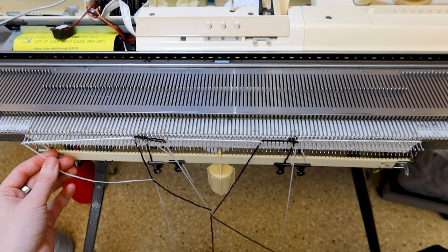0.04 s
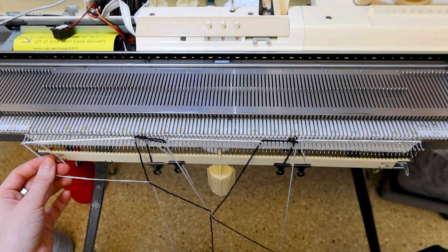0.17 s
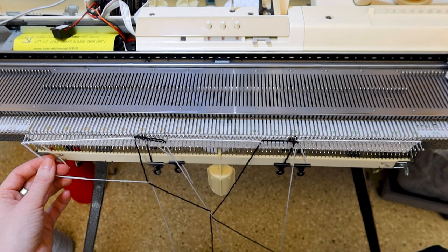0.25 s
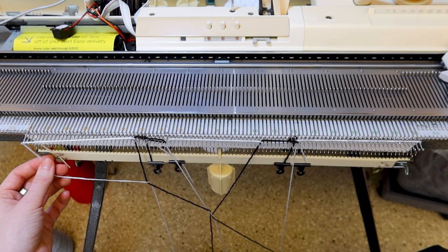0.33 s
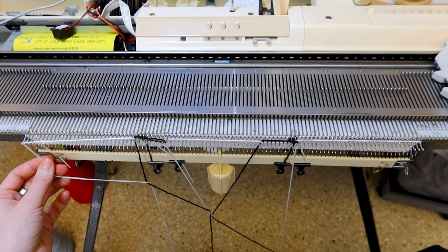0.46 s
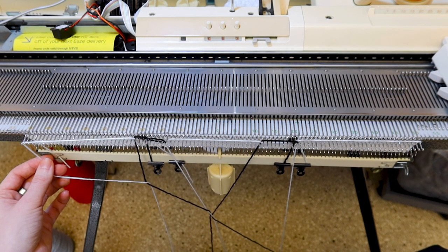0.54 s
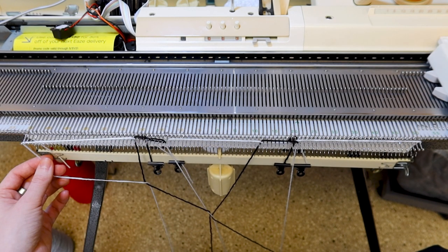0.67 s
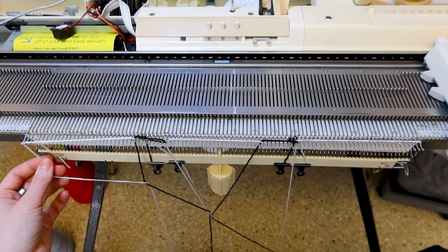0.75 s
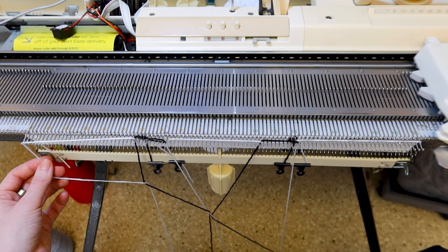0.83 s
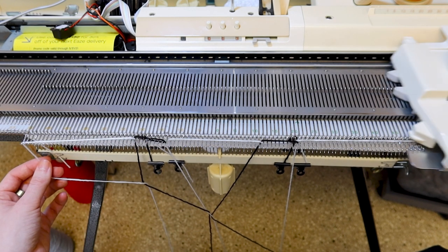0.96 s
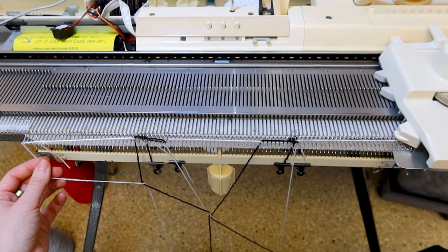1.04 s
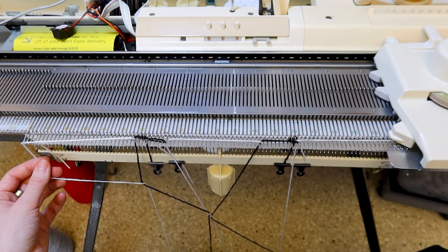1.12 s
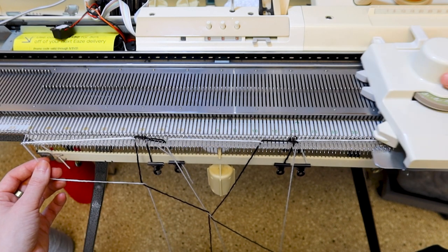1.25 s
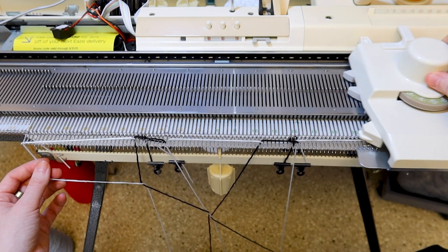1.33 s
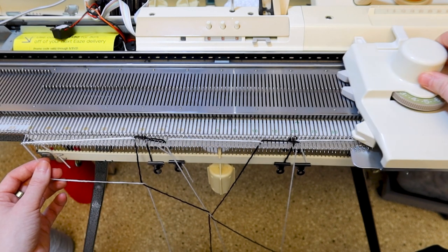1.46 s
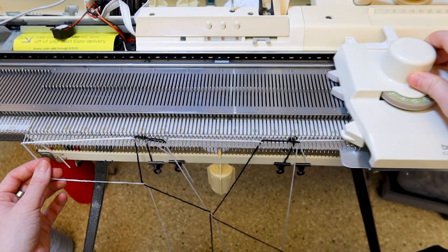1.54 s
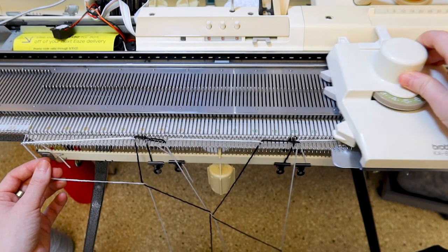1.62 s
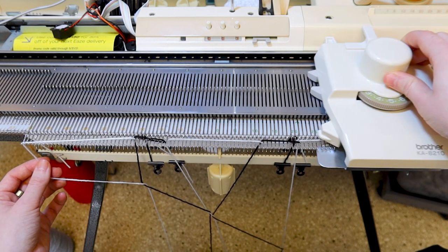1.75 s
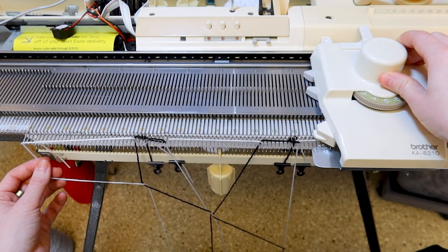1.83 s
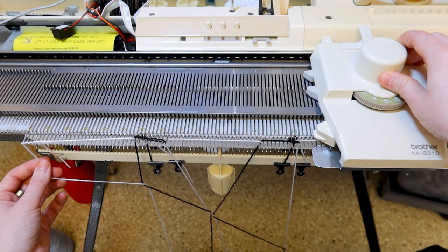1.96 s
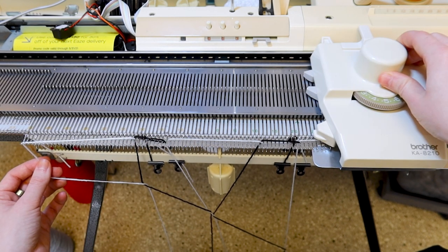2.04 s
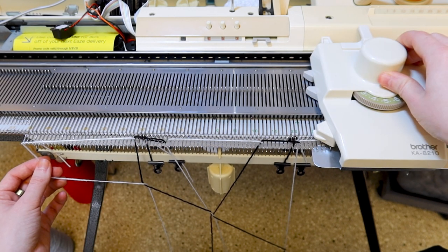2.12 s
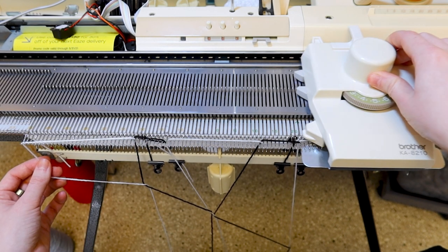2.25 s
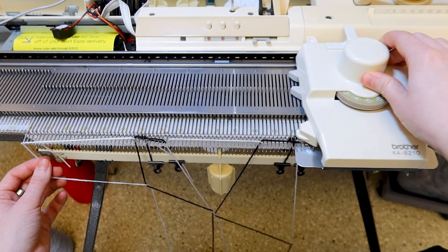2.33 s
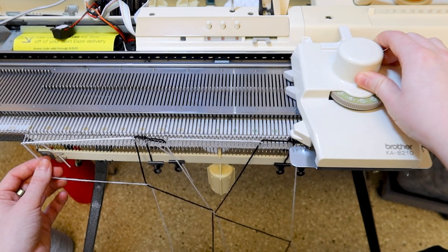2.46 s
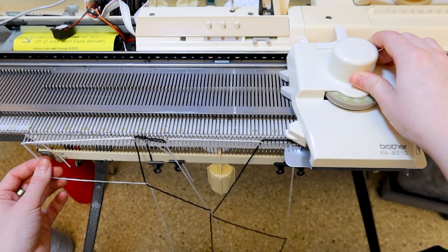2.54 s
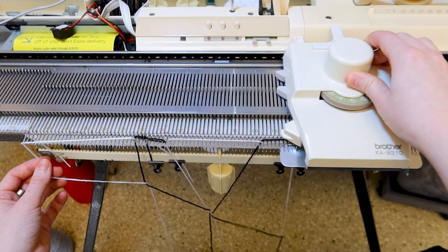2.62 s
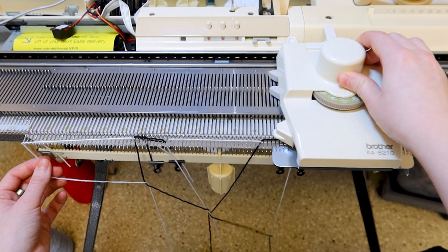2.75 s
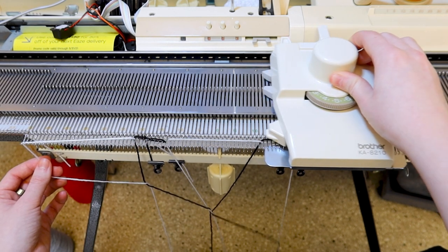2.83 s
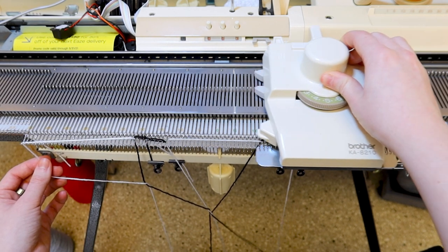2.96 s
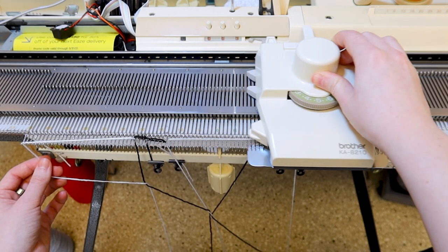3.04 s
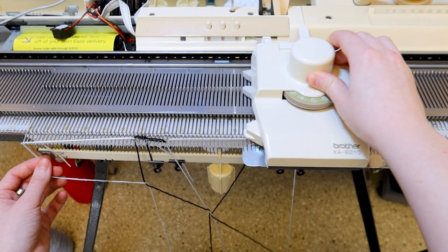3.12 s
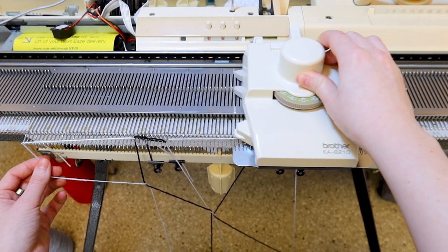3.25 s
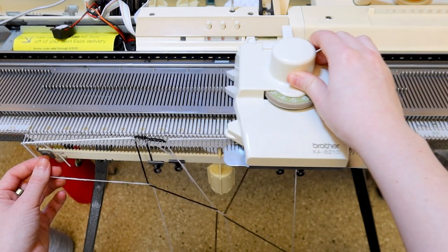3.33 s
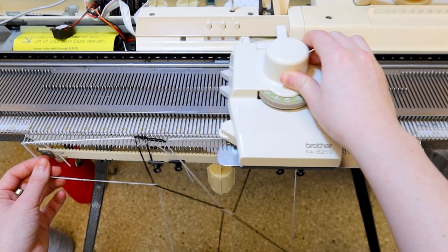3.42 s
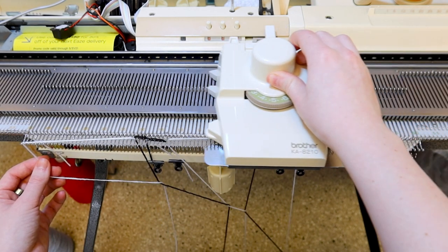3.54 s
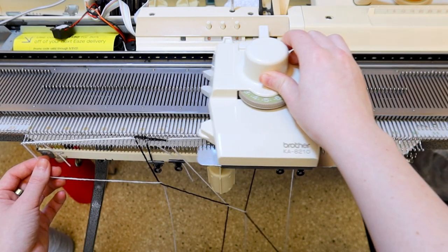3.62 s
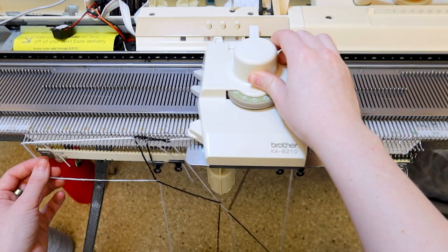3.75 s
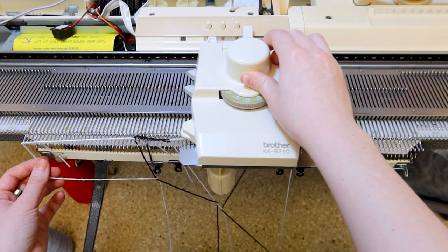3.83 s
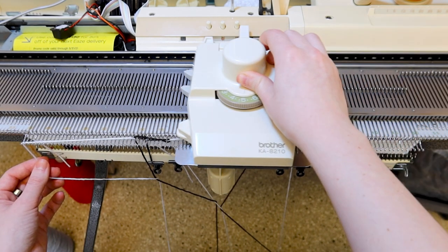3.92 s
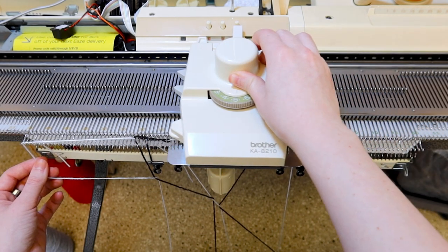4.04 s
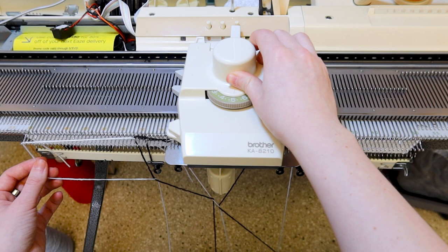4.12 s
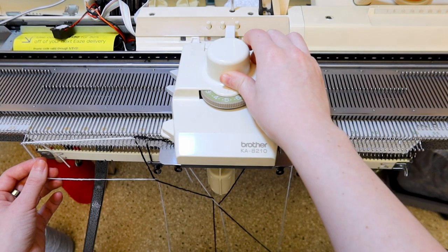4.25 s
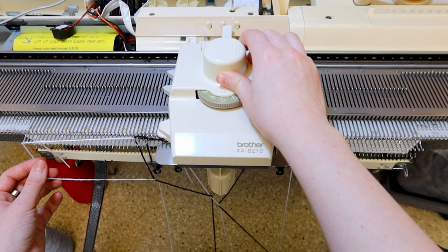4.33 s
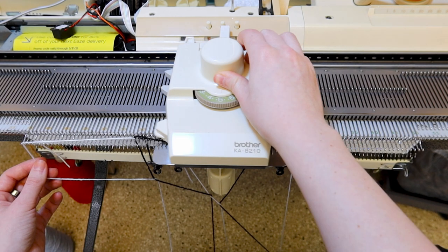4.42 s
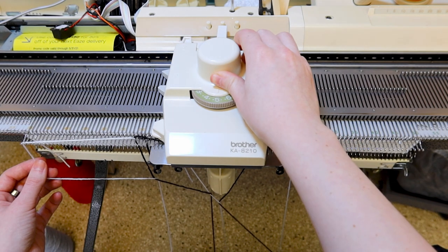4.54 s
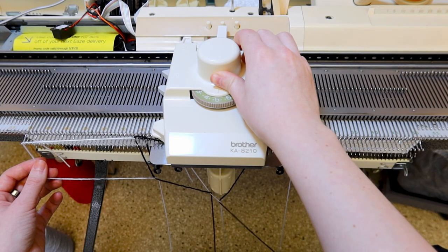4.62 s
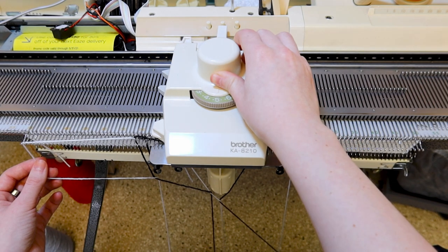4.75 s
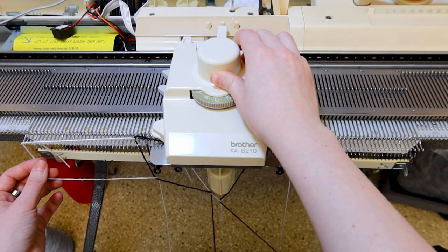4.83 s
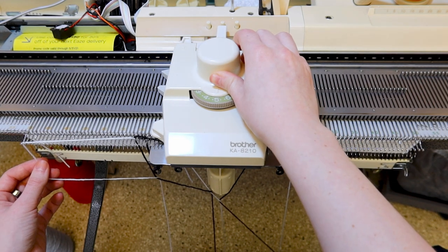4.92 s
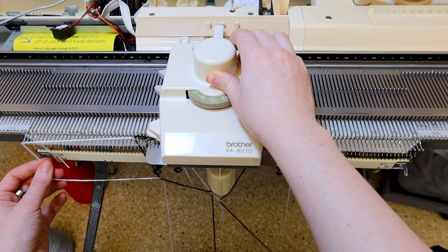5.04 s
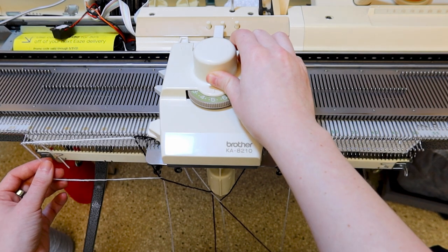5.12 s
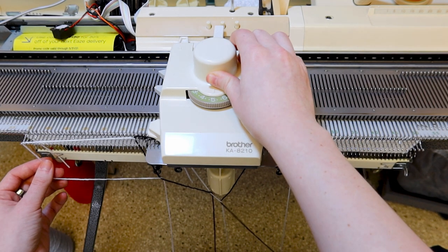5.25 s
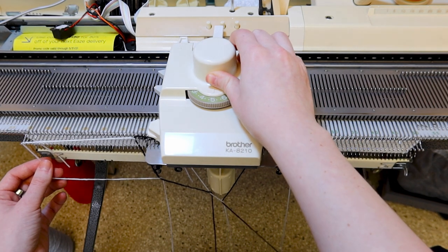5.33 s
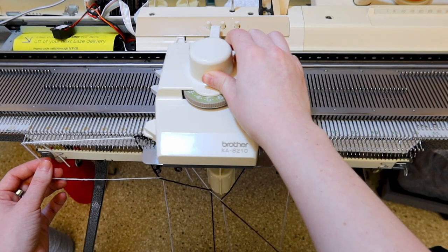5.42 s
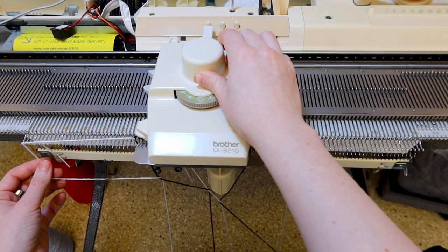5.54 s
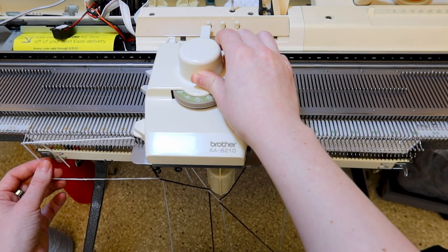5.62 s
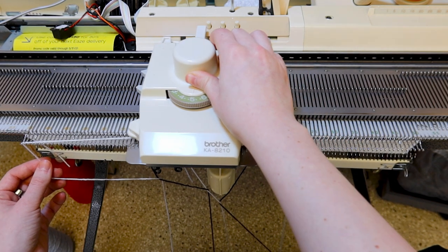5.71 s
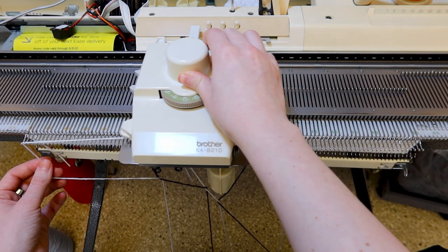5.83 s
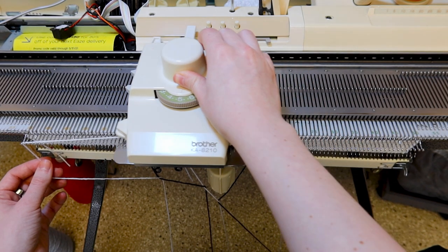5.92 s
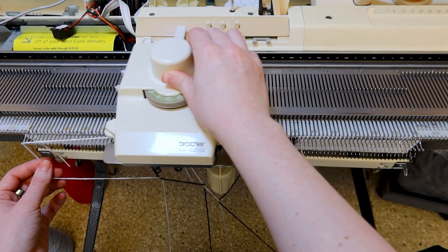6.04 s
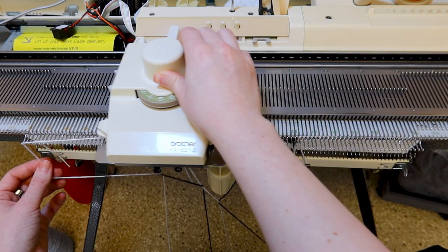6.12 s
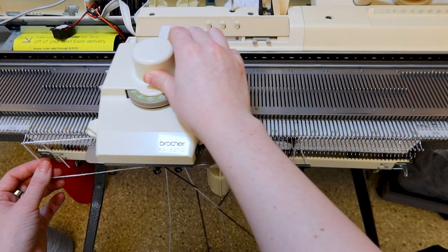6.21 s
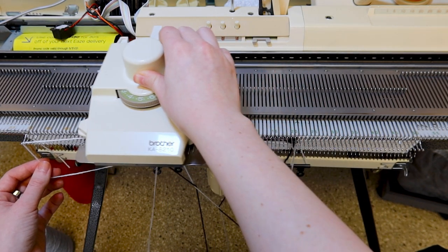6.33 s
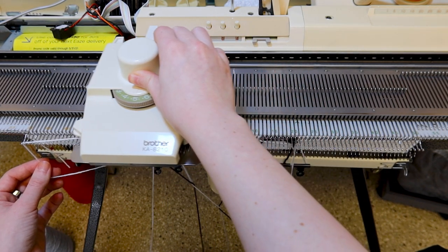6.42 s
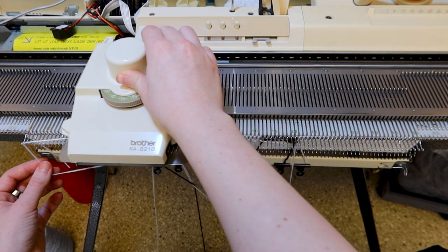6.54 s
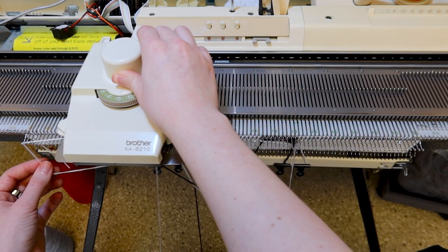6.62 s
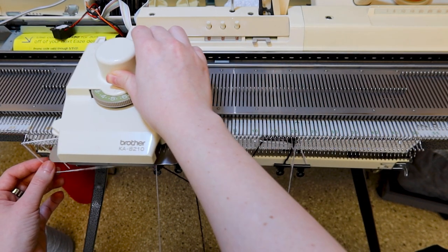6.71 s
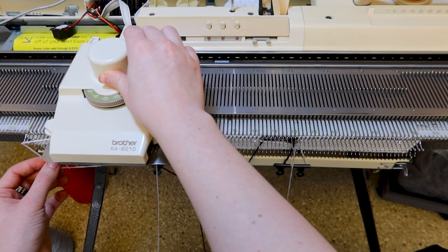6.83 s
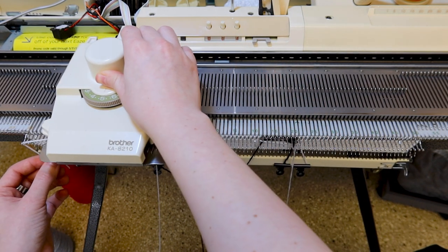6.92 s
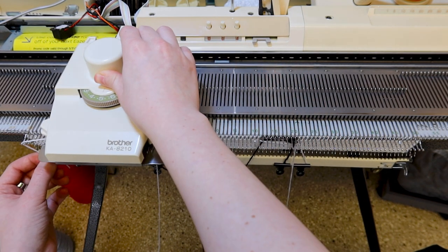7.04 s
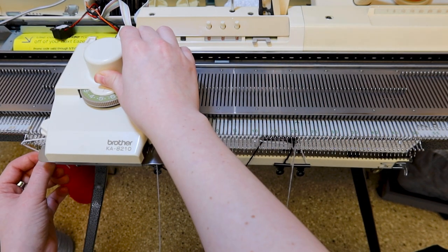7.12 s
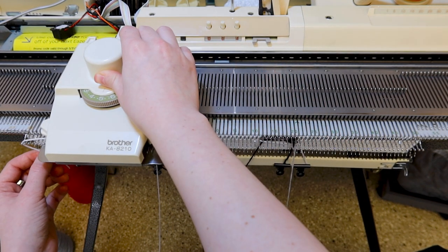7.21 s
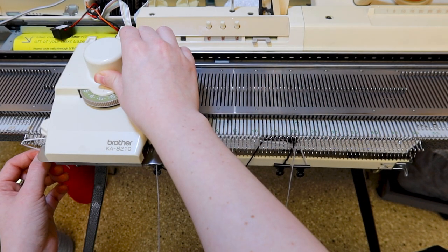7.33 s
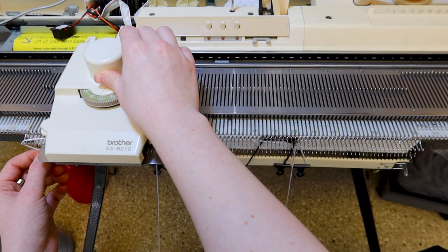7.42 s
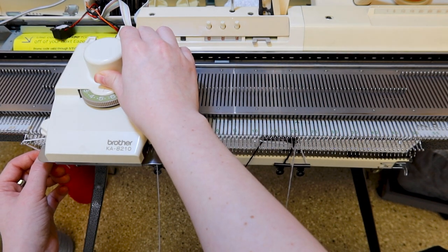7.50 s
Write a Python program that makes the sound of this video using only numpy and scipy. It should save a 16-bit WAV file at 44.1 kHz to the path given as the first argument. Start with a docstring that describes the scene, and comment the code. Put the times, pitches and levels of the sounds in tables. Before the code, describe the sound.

A plastic handle creaks faintly, then a carriage rasps jerkily across steel needles with rapid metallic clicking, one hard knock midway, and short pauses.

```python
"""A small quiet room, with a stereo microphone close to a knitting machine's steel needle bed.
The room hums and hisses. A hand takes hold of the carriage, and its plastic creaks as resonances fed by slips.
The carriage then goes along the bed in jerks: shaped noise makes the rub, and puffs of noise into steel
resonances make needle after needle flick. Once it knocks over a stop, a crack and a low boom.
The walls answer with a short decaying tail."""
import sys
import numpy as np
from scipy import signal
from scipy.fft import rfft, irfft, next_fast_len
from scipy.io import wavfile
from scipy.ndimage import uniform_filter1d, map_coordinates

SR = 44100
rng = np.random.default_rng(int(sys.argv[2]) if len(sys.argv) > 2 else 0)


def int16_out(signal):
    """Quantize to a 16-bit WAV file."""
    q = np.round(np.clip(np.atleast_2d(signal).T, -1, 1) * 32767)
    wavfile.write(sys.argv[1], SR, q.astype(np.int16))


N = 333837  # samples

# Levels in the tables guide each layer before the microphone and walls.
# steep() narrows its resonances, so a nominal_width_hz is not the final width.

# The room at rest: pitch_hz, relative_density_db (per Hz)
AIR = [(12, -39.5), (20, -6.5), (37, -18.5), (70, -3), (95, -8.5), (137, -3), (227, -5), (292, -15),
       (317, -12.5), (397, -11.5), (620, -17.5), (674, -18), (969, -19.5), (4250, -29.5), (15800, -46.5)]
# Likeness of the room in the two ports: pitch_hz, left_right_likeness (-1 to 1)
AIR_ALIKE = [(60, 1), (180, 0.77), (550, 0.1084), (1650, 0.056), (4970, 0.43), (15000, 0.18)]
# Swell of the room's low part: time_s, change_db
DRONE = [(0, -6), (.7, -3), (3, -4), (5, -1.5), (6.5, -5), (7.5, -7.5)]
# A faint low hum: time_s, pitch_hz, level_db (both waver)
HUM = [(.35, 210, -92), (.55, 215.6, -80), (.85, 228, -75), (1.03, 224, -70), (1.12, 236, -101)]
# Decay of the walls' tail: pitch_hz, t60_s
ROOM = [(200, 0.47), (2000, 0.35), (10000, 0.12)]
# Likeness of the close sound in the two ports: pitch_hz, left_right_likeness (-1 to 1)
NEAR_ALIKE = [(300, 1), (700, 0.98), (1400, 0.99), (3100, 0.92), (5500, 0.59), (8000, 0.053),
              (11000, -0.26), (15000, -0.78)]
# Balance as the carriage crosses before the ports: time_s, left_over_right_db
LEAN = [(0, 2.5), (2, 1.13), (3.5, 0.5), (4.5, -1.3), (7.5, 0)]
AIR_DB, TOP_HZ = -66, 15830  # room level; top of the microphone's band

# The handle creaks: time_s, level_db, thin_ring_level_db
GRIP = [(0.12, -92, -99), (0.148, -95, -99), (0.192, -68, -79.5), (0.33, -62, -64), (0.41, -73, -87),
        (0.44, -67.5, -90), (0.486, -55.5, -70), (0.535, -65, -72), (0.618, -85, -99), (0.64, -79, -99)]
# Single slips in the plastic: start_s, peak_db, upper_mode_lift_db, favoured_pitch_hz
TICKS = [(0.194, -54, 26, 3220), (0.222, -59, 8, 4080), (0.312, -52, -17, 2180), (0.445, -54, 5, 2930),
         (0.464, -46, 3, 4520), (0.479, -44, 3, 3220), (0.495, -46.5, -2, 3220), (0.7578, -55, 11, 2930),
         (0.8317, -57, 5, 2930), (0.852, -52, 4, 2930), (5.3272, -51.5, 21, 2930), (5.405, -55.5, 16, 3550)]
# Resonances of the plastic handle: pitch_hz, nominal_width_hz, level_db
HANDLE = [(580, 210, 2.5), (1415, 54, 15), (2180, 890, -2.5), (2930, 210, -12.5), (3220, 140, -6.5),
          (3550, 38, -6), (4080, 55, -11), (4520, 40, -4), (5300, 310, -8.5)]
# The thin low ring in the creak: pitch_hz, nominal_width_hz, level_db
THIN_RING = [(950, 14, 0)]
UPPER_HZ, FAVOUR_DB = 1800, 9  # start of the handle's upper modes; lift of a tick's favoured mode
TICK_S = 0.00213  # contact time

# The carriage strikes a stop and rebounds: start_s, crack_peak_db, boom_peak_db
KNOCK = [(3.514, -14.5, -31), (3.517, -19.5, -17), (3.521, -20.5, -22.5), (3.536, -23, -28),
         (3.555, -24.5, -28.5)]

# The push, one list for each shove: time_s, needle_rub_db, shell_rub_db, shell_rub_centre_hz
SHOVES = [
    [(0.93, -72, -66, 1280), (0.958, -73.5, -46, 940), (1.005, -58.5, -61.5, 875), (1.032, -49.5, -58, 850),
     (1.088, -46, -53.5, 1047), (1.156, -56, -55.5, 940), (1.298, -47, -50, 980), (1.406, -39.5, -39, 970),
     (1.434, -49.5, -47, 900), (1.534, -52.5, -49, 1130), (1.64, -42.5, -42, 810), (1.752, -41, -43, 840),
     (1.856, -47, -45, 850), (2.05, -98, -79.5, 775)],
    [(2.18, -90, -87, 1110), (2.212, -58, -56.5, 958), (2.262, -41.5, -44.5, 830),
     (2.582, -53, -50.5, 1050), (2.664, -46, -49.5, 870), (2.832, -50.5, -50, 1050),
     (2.874, -47.5, -46, 879), (3.096, -41.5, -44, 920), (3.274, -46, -46, 980), (3.374, -40, -41, 840),
     (3.46, -38.5, -42, 1020)],
    [(3.61, -39, -42, 1000), (3.66, -40.5, -41, 1000), (3.69, -38, -42.5, 950), (3.942, -48.5, -47.5, 800),
     (4.152, -50.5, -51, 1160), (4.182, -65.5, -50.5, 1120), (4.226, -54.5, -54.5, 1150),
     (4.472, -60.5, -54.5, 1170), (4.526, -59.5, -56.5, 850), (4.572, -56, -54.5, 1130),
     (4.672, -99, -92, 842), (4.7, -79, -78, 950)],
    [(5.0, -90.5, -74, 833), (5.048, -52, -70.5, 1140), (5.06, -72, -53.5, 1080), (5.094, -61.5, -56, 1114),
     (5.2, -91, -81.5, 1020)],
    [(5.428, -83, -90, 979), (5.44, -55, -59.5, 960), (5.53, -42, -44.5, 1020), (5.684, -54.5, -54.5, 1060),
     (5.964, -49.5, -50.5, 970), (6.108, -43.5, -45.5, 727), (6.166, -35.5, -40.5, 804),
     (6.392, -43.5, -45.5, 815), (6.48, -46.5, -49, 1120), (6.528, -38, -42, 940), (6.658, -47, -47.5, 860),
     (6.774, -45.5, -48, 1080), (6.864, -45, -46.5, 760), (6.994, -53, -53.5, 985), (7.15, -88, -83, 755)],
]
# Bed and carriage shell: pitch_hz, nominal_width_hz, level_db
SHELL = [(373, 264, -10.5), (485.7, 30, 2), (601, 82, -2), (685, 97, -1), (817.7, 101, 0), (916, 141, -3),
         (1068, 193, -8), (1249, 175, -0.5), (1335, 113, -3.5), (1337, 44, -9), (1620, 420, -5.5)]
# Needles in their slots: pitch_hz, nominal_width_hz, level_db
NEEDLE = [(2010, 346, -10), (2198, 160, -2.5), (2870, 110, -2), (3056, 218, 0), (3360, 555, -3),
          (4460, 90, -1.5), (4663, 100, 3), (5610, 440, -3.5), (7040, 130, -14), (7800, 1250, -7.5),
          (8110, 470, 1.5), (9200, 1100, -12.5), (10000, 260, -3), (10800, 2300, -8.5), (12420, 310, -5),
          (12920, 610, -3)]
# Metal sliding on metal: pitch_hz, relative_density_db (per Hz)
HISS = [(400, -14.5), (1500, 26.5), (5500, -9), (6700, 0), (9000, 26.5), (13000, 19.5), (15800, -41)]
# Edges of the families of modes, low to high: pitch_hz
FAMILIES_HZ = [0, 540, 760, 980, 1150, 1380, 1850, 3300, 4550, 6500, 20000]
# Level of each family against its rub level, low to high: relative_level_db
SHARE_DB = [-7.5, -3.5, -1.5, -3, -3, -7.5, -9, -7.5, -10, -11]
FALL_DB = 6  # loss per octave for shell modes away from the rub's centre
UNDER_CAM_DB, UNDER_CAM_S = 5, 0.42  # greatest lift of the flicked needles' family; averaging time

# A thin steel part that rings long: pitch_hz, width_hz, level_db (at a needle rub of -52.5 dB)
WIRE = [(4430, 11, -68)]
WIRE_FOLLOWS = .6  # dB per dB of needle rub

# Rings of the bed that shift and swell as the carriage moves along it:
# width_hz, then a list of time_s, pitch_hz, level_under_needle_rub_db
RINGS = [(45, [(1.0, 980, -14), (1.08, 1045, -3), (1.3, 1040, -2), (1.5, 1040, -8), (2.0, 1020, -18),
         (4.6, 1050, -18), (5.1, 1130, -8), (5.6, 1060, -12), (7, 1060, -20)]), (150, [(1.0, 2600, -11),
         (1.3, 2560, -18), (2.3, 2600, -14), (3.5, 2560, -14), (4.6, 2500, -12), (5.06, 2600, -20),
         (5.075, 2560, -11), (5.6, 2480, -13), (6.1, 2360, -13), (7, 2400, -16)]), (80, [(1.0, 4170, -8),
         (1.3, 4120, -7), (1.8, 4120, -13), (2.26, 4100, -11), (2.5, 4080, -17), (3.5, 4080, -17),
         (4.6, 4060, -14), (5.5, 4060, -11), (5.9, 4060, -8), (7, 4050, -10)]), (130, [(1.0, 4790, -14),
         (1.8, 4900, -16), (2.4, 5100, -14), (3.0, 5120, -8), (3.6, 5080, -10), (4.5, 4950, -11),
         (5.1, 4700, -14), (7, 4750, -18)]), (110, [(1.0, 5300, -11), (1.8, 5330, -11), (2.4, 5300, -13),
         (3.0, 5320, -7), (4.5, 5330, -11), (5.1, 5330, -14), (5.6, 5380, -8), (6.1, 5380, -7),
         (6.4, 5370, -13), (7, 5330, -17)]), (130, [(1.45, 6200, -15), (1.55, 5750, -15), (2.0, 5750, -16),
         (2.2, 6250, -16), (3.0, 6270, -14), (4.6, 6200, -18), (5.3, 5900, -17)]), (150, [(1.0, 7400, -10),
         (1.2, 7400, -16), (1.5, 7400, -26)]), (170, [(1.0, 8950, -24), (1.3, 8950, -19), (1.8, 8950, -18),
         (2.3, 8950, -23), (7, 8950, -24)]), (200, [(1.0, 1950, -15), (3.5, 1800, -13), (4.6, 1850, -15),
         (5.0, 1850, -26)])]
# Loose needles jostle: jolts a second, spread in dB, steady part, jolted part
RATTLE_PER_S, RATTLE_SPREAD_DB, RATTLE_SMOOTH, RATTLE_SHARE = 91, 5, 0.37, 0.54
JOG_DB, JOG_S = -11.5, 0.01  # each flick jogs the rings, dying in about this time

# Needles flicked by the cams: time_s, guide_peak_db, strongest_ring_hz, latch_snap_relative_db
FLICKS = [(0.952, -47, 3610, -33), (0.9891, -42.5, 3350, -39), (1.015, -37, 4200, 0.5),
          (1.057, -34.5, 4244, -6), (1.0807, -36.5, 4260, -12.5), (1.113, -37, 4095, -13.5),
          (1.1445, -47, 4080, -13.5), (1.166, -36, 4200, -10.5), (1.212, -39.5, 5370, -9.5),
          (1.252, -34.5, 4127, -9), (1.2827, -37.5, 4070, -9.5), (1.3249, -38, 4150, -8),
          (1.3523, -31, 5460, -12.5), (1.3813, -36, 5570, -3), (1.3955, -39.5, 5300, -20),
          (1.4414, -35, 4200, -13), (1.477, -37.5, 1976, -20), (1.5005, -39.5, 1974, -18.5),
          (1.5579, -37.5, 5460, -11), (1.586, -41, 4230, -12.5), (1.6222, -36, 5780, -20),
          (1.6432, -40, 5260, -3.5), (1.6682, -34, 2170, -16), (1.6897, -36, 2590, -11),
          (1.73, -34, 5200, -12), (1.7527, -36, 5700, -14), (1.7917, -37.5, 3720, -14),
          (1.859, -42, 2010, -2.5), (2.218, -47.5, 2650, -10), (2.2423, -49, 3900, 5.5),
          (2.265, -34, 4350, -17), (2.3094, -34.5, 2710, -6.5), (2.3304, -37, 3470, -6),
          (2.3542, -36.5, 2780, -9), (2.38, -37.5, 2816, -28), (2.4184, -43.5, 2850, -4.5),
          (2.4563, -41.5, 5300, -6), (2.4956, -35.5, 2770, -7.5), (2.5722, -42, 2930, -4.5),
          (2.602, -43, 2620, -16.5), (2.6282, -39, 3840, -3), (2.649, -38.5, 2930, -11),
          (2.6675, -41, 4610, -8), (2.706, -33.5, 4250, -13), (2.759, -44, 3830, -5.5),
          (2.7807, -40.5, 4480, -20), (2.833, -41.5, 3630, -13), (2.853, -37.5, 5000, -14.5),
          (2.8734, -42.5, 5270, -15), (2.9126, -37.5, 2930, -16.5), (2.9307, -36.5, 5190, -12),
          (2.9626, -31.5, 2754, -17.5), (2.9986, -33.5, 5000, -12.5), (3.054, -33.5, 4770, -17),
          (3.0777, -34, 2630, -13.5), (3.0967, -31, 5290, -13), (3.1538, -32, 5320, -14.5),
          (3.2138, -35, 5300, -12.5), (3.269, -40.5, 5300, -2.5), (3.2919, -36, 5130, -17),
          (3.3226, -29.5, 4890, -12), (3.3753, -30.5, 2450, -10), (3.4207, -34.5, 5290, -15),
          (3.4579, -38.5, 5260, -26), (3.585, -35, 2210, -10), (3.6271, -37, 5330, -9),
          (3.6705, -32.5, 2010, -12.5), (3.718, -34, 1910, -8), (3.7594, -37, 5420, -12.5),
          (3.7929, -41, 4880, -9.5), (3.8276, -41.5, 2230, -10.5), (3.8574, -32, 3980, -8),
          (3.9079, -30.5, 2726, -8.5), (3.9818, -41, 2760, -8.5), (4.0132, -39, 4760, -7),
          (4.0292, -42, 4860, 4.5), (4.0626, -40, 4760, -11.5), (4.115, -44, 2780, -7),
          (4.1435, -41.5, 4920, -9), (4.2156, -38.5, 2730, -1.5), (4.245, -45, 5300, -12.5),
          (4.2647, -42, 4470, 2), (4.3087, -41, 2500, -6), (4.327, -38, 5200, -10.5),
          (4.382, -48, 2730, 4.5), (4.415, -52.5, 4040, -3.5), (4.4393, -42.5, 2700, -8.5),
          (4.5074, -52, 5280, -3), (4.519, -41, 2810, -11), (4.5393, -46.5, 5320, -31),
          (4.5579, -48.5, 5270, -10), (5.0429, -37.5, 4360, -3.5), (5.0734, -44, 2520, -10.5),
          (5.0973, -37.5, 2600, -21), (5.436, -43, 2560, -15), (5.444, -40.5, 5100, -4.5),
          (5.4665, -42.5, 2790, -1.5), (5.484, -37, 2760, -13.5), (5.5295, -33, 5150, -8.5),
          (5.5739, -38.5, 2880, -24), (5.6087, -35.5, 2630, -19.5), (5.6683, -38.5, 4080, -5.5),
          (5.7011, -38.5, 5300, -12), (5.76, -40.5, 3160, -10), (5.7765, -41, 5430, -11),
          (5.7924, -42, 3035, 0), (5.838, -36.5, 3980, -11.5), (5.851, -47, 5300, -8.5),
          (5.91, -38, 4080, -7), (5.9323, -38.5, 5560, -10.5), (5.947, -49, 4080, -14),
          (5.9601, -40.5, 3150, -3), (5.981, -36, 5980, -15.5), (5.9925, -41.5, 5420, -9.5),
          (6.0287, -34, 3900, -10.5), (6.0712, -43, 3070, -11), (6.0914, -39.5, 5500, -11),
          (6.124, -33, 5490, -9.5), (6.1651, -35, 2400, -5.5), (6.1899, -40.5, 3960, -1.5),
          (6.2311, -36, 4050, -5), (6.2709, -33, 3310, -11), (6.3681, -35.5, 3960, -9.5),
          (6.423, -38.5, 2880, -10), (6.4823, -34.5, 4064, -9), (6.496, -35, 4150, -15.5),
          (6.5305, -33.5, 4060, -14.5), (6.574, -30, 4040, -10.5), (6.6135, -28.5, 3940, -16.5),
          (6.6437, -33, 2840, -2), (6.6687, -34, 3750, -7), (6.731, -35, 4050, -12.5),
          (6.8066, -34, 2800, -11.5), (6.821, -38, 4140, -24), (6.866, -35, 4070, -1),
          (6.9387, -35, 5180, -5), (6.9845, -45.5, 3800, -16.5)]
# A needle latch: pitch_hz, nominal_width_hz, level_db
LATCH = [(7120, 90, 0), (8950, 130, 0), (10000, 200, -7), (11500, 200, 0), (12500, 300, -5),
         (13800, 1000, -11)]
# Contact time at a -51 dB needle rub; its log growth per dB of rub; its log spread by chance
FLICK_S, LONGER_PER_DB, LENGTH_SPREAD = .0034, 0.06, 0.11
LATCH_CREST_DB, SHARPER_PER_DB = 7, .09  # snap peak over its level; a harder snap is shorter
THUD_DB, THUD_SPREAD_DB = 6, 1  # thud peak over the shell rub at that moment
REBOUND_S, REBOUND_DB = .011, -10.5  # typical delay and level of the second hit
OWN_WIDTH_HZ, OWN_DB = 108, -12.5  # the flicked needle's own mode, before it is favoured
RING_IN_FLICK_DB = 14.5  # lift of the bed's rings inside a flick
PING_DB, PING_S, PING_WAVER = -2, .0045, .45  # clean ring under guide peak; fall time; waver in radians


def amp(db):
    """Decibels to amplitude."""
    return 10 ** (np.asarray(db) / 20)


def unit(x):
    """Scale to an rms of 1."""
    return x / np.sqrt(np.mean(x ** 2) + 1e-20)


def peak(x, db):
    """Scale to a peak level in dB."""
    return x * amp(db) / np.max(np.abs(x))


def along(points, hz):
    """Read (Hz, value) points on a log axis."""
    f, v = np.transpose(points)
    return np.interp(np.log(hz + 1), np.log(f + 1), v)


def curve(rows, column, rest):
    """One value per sample; rest outside the table."""
    rows = np.array(rows)
    return np.interp(np.arange(N) / SR, rows[:, 0], rows[:, column], rest, rest)


def wobble(rate):
    """A smooth random curve, rate knots a second."""
    coarse = np.arange(0, N + 32, 32)
    knots = rng.standard_normal(int(N * rate / SR) + 4)
    return np.interp(np.arange(N), coarse, map_coordinates(knots, [coarse * rate / SR]))


def filtered(x, response):
    """x times a complex response of frequency."""
    m = next_fast_len(x.shape[-1] + min(x.shape[-1], 8192))
    return irfft(rfft(x, m) * response(np.fft.rfftfreq(m, 1 / SR)), m)[..., :x.shape[-1]]


def modes(table, more_db=0):
    """The causal response of a set of resonances, alternating in sign."""
    c, w, db = np.transpose(table)[..., None]
    w = np.abs(w)
    gain = (-1) ** np.arange(len(table))[:, None] * amp(db + np.reshape(more_db, (-1, 1)))
    return lambda f: np.sum(gain * 1j * f * w / (c * c - f * f + 1j * f * w), axis=0)


def steep(table, more_db=0):
    """Resonances with dark valleys: each mode applied twice, so its skirts fall fast."""
    c, w, db = np.transpose(table)[..., None]
    gain, w = amp(db + np.reshape(more_db, (-1, 1))), 1.84 * np.abs(w)
    return lambda f: np.sum(gain * (1j * f * w / (c * c - f * f + 1j * f * w)) ** 2, axis=0)


def burst(length, sharp=0.27):
    """A contact that chatters: noise that swells and dies, its envelope peaking at 1."""
    u = np.arange(3000) / SR / np.clip(length, .0002, .02)
    return (u * np.exp(1 - u)) ** sharp * rng.standard_normal(len(u))


def snap(length, delay):
    """A short even puff of noise centred on delay, as quick to rise as to fall."""
    t = np.arange(3000) / SR
    return np.exp(-((t - delay) / length) ** 2) * rng.standard_normal(len(t))


def grit(rate, spread_db, smooth):
    """Tiny slips of uneven size at random moments, each a short chatter, over a share of smooth rubbing."""
    slips = (rng.random(N) < rate / SR) * amp(spread_db * rng.standard_normal(N))
    chatter = signal.fftconvolve(slips, np.hanning(90), "same")
    return (unit(chatter) + smooth) * rng.standard_normal(N)


def pair(mid, side, alike):
    """Left and right from two versions of a sound, alike as the table says."""
    turn = lambda hz: np.arccos(np.clip(along(alike, hz), -1, 1)) / 2
    turned = lambda hz: np.array([np.cos(turn(hz)), np.sin(turn(hz))])
    a, b = filtered(np.array([mid, side]), turned)
    return np.array([a + b, a - b])


def air():
    """The hum and hiss of the room: shaped noise whose low part swells and fades."""
    a, b = filtered(rng.standard_normal((2, N)), lambda hz: amp(along(AIR, hz)))
    low_db = np.interp(np.arange(N) / SR, *np.transpose(DRONE))
    drone = filtered(np.array([a, b]), lambda hz: 1 / (1 + (hz / 280) ** 6))
    a, b = a + (amp(low_db) - 1) * drone[0], b + (amp(low_db) - 1) * drone[1]
    return amp(AIR_DB) * unit(pair(a, b, AIR_ALIKE))


def hum():
    """A faint, fuzzy low tone from somewhere in the building: a sine wavering in pitch and level."""
    turns = np.cumsum(curve(HUM, 1, 0) + 6 * wobble(31.0)) / SR
    return amp(curve(HUM, 2, -200) + 8.0 * wobble(24.4)) * np.sqrt(2) * np.sin(2 * np.pi * turns)


def tails(t60s, count):
    """Wall tails: decaying noise of energy 1; each frequency dies at its own speed."""
    hz, t, z = signal.stft(rng.standard_normal((count, SR // 2)), SR, nperseg=256)
    tail = signal.istft(z * amp(-60 * t / along(t60s, hz)[:, None]), SR, nperseg=256)[1]
    return tail / np.linalg.norm(tail, axis=1, keepdims=True)


def scatter(x):
    """The same sound by other short paths, which change as the carriage moves: its phases drift."""
    z = signal.stft(x, nperseg=256)[2]
    drift = uniform_filter1d(rng.standard_normal(z.shape), size=3, axis=0)
    drift = uniform_filter1d(drift, size=30, axis=1)
    y = signal.istft(z * np.exp(1j * np.pi * unit(drift)), nperseg=256)[1][:N]
    return unit(y) * np.std(x)


def creak():
    """Fingers load the handle: a run of small slips in the plastic, and a few single ticks."""
    ticks, hz = np.zeros(N + SR), np.array(HANDLE)[:, 0]
    for s, db, lift_db, own_hz in TICKS:
        favour_db = FAVOUR_DB * np.exp(-(np.log(hz / own_hz) / .06) ** 2)
        more_db = lift_db * (hz > UPPER_HZ) + favour_db + rng.normal(0, 2.7, len(HANDLE))
        tick = filtered(snap(TICK_S, TICK_S), steep(HANDLE, more_db))
        ticks[round(s * SR):][:len(tick)] += peak(tick, db)
    slips = grit(300, 1.8, 1.0)
    thin = amp(curve(GRIP, column=2, rest=-200)) * unit(filtered(slips, steep(THIN_RING)))
    run = unit(amp(1.62 * wobble(58.3)) * filtered(slips, steep(HANDLE)))
    return ticks[:N] + thin + amp(curve(GRIP, 1, -200)) * run


def knock():
    """A hard blow: a wide crack, then the shell booms, most in its modes near 740 Hz."""
    out, hz = np.zeros(N + SR), np.array(SHELL)[:, 0]
    crack_colour = [(800, -20.5), (1500, 6), (2000, 11.0), (3500, 2.0), (6000, 3.0), (15000, -1.0)]  # Hz, dB
    # narrower shell modes ring longer; two low ones join them
    boom_modes = np.vstack([np.array(SHELL) * [1, .45, 1], (195, 25, -26), (280, 40, -24)])
    boom_db_by_mode = np.append(-15 * np.abs(np.log2(hz / 740)), [0, 0])
    for s, crack_db, boom_db in KNOCK:
        crack = filtered(snap(0.0046, 0.0028), lambda f: amp(along(crack_colour, f)))
        push = np.arange(len(crack)) == 0
        boom = filtered(push, steep(boom_modes, boom_db_by_mode))
        out[round(s * SR):][:len(crack)] += peak(crack, crack_db) + peak(boom, boom_db)
    return out[:N]


def rub():
    """The push as three curves: needle rub dB, shell rub dB and shell centre Hz."""
    first, before, after, *rest = SHOVES
    strokes = [first, before + after, *rest]  # the carriage keeps sliding through the knock
    return [np.max([curve(rows, column, -200) for rows in strokes], axis=0) for column in range(1, 4)]


def off_centre(hz, centre_hz):
    """Level change in dB of a shell mode away from the centre of the rub."""
    return -FALL_DB * np.abs(np.log2(hz / np.clip(centre_hz, 400, 1800)))


def under_cam(low, high):
    """Share, 0-1, of the needles now under the cams that ring between low and high Hz."""
    s, _, hz, _ = np.transpose(FLICKS)
    belongs = np.interp(np.arange(N) / SR, s, (low <= hz) & (hz < high))
    return uniform_filter1d(belongs, size=int(UNDER_CAM_S * SR))


def patchy(x, depth_db):
    """Other needles take over as the carriage moves: the colour drifts in small patches."""
    z = signal.stft(x, nperseg=256)[2]
    field = uniform_filter1d(rng.standard_normal(z.shape), size=4, axis=0)
    field = uniform_filter1d(field, size=14, axis=1)
    return signal.istft(z * amp(depth_db * unit(field)), nperseg=256)[1][:N]


def wire():
    """The needle rub shakes a thin part with one long ring."""
    noise, ring = rng.standard_normal(N), modes(WIRE)
    shake = amp(WIRE_FOLLOWS * (rub()[0] + 52.5)) * noise
    steady, shaken = filtered(np.array([noise, shake]), ring)
    return amp(WIRE[0][2]) * shaken / np.std(steady)


def slide():
    """The cams drag along the bed in uneven surges; each family of modes also wanders on its own."""
    rough = grit(400, 4, 1.0)
    surge, slips, out = wobble(45), patchy(rough, 1.1), np.zeros(N)
    needle_db, shell_db, centre_hz = rub()
    for share_db, low, high in zip(SHARE_DB, FAMILIES_HZ, FAMILIES_HZ[1:]):
        members = [m for m in SHELL + NEEDLE if low <= m[0] < high]
        family = steep(members)
        excite = amp(0.4 * surge + 1.6 * wobble(7)) * slips
        if low > SHELL[-1][0]:
            rub_db = needle_db + UNDER_CAM_DB * under_cam(low, high)
        else:
            rub_db = shell_db + off_centre(np.mean([m[0] for m in members]), centre_hz)
        level = amp(share_db + rub_db)
        # level of the family under an unchanging rub
        steady = np.std(excite) * np.sqrt(np.mean(np.abs(family(np.arange(SR // 16) * 8.0)) ** 2))
        out += filtered(level * excite, family) / steady
    # plain sliding between the modes follows the top family's level
    hiss = unit(filtered(amp(4.0 * surge) * slips, lambda hz: amp(along(HISS, hz))))
    return amp(-2.5) * out + amp(2.0) * level * hiss


def jogs(needle_db):
    """The strength of every flick over the rub, swelling and dying away after it."""
    s, db, _, _ = np.transpose(FLICKS)
    at = np.round(s * SR).astype(int)
    hits = np.bincount(at, amp(np.clip(db - needle_db[at], 0, 18) + JOG_DB), N)
    t = np.arange(2000) / SR
    return signal.fftconvolve(hits, t / JOG_S * np.exp(1 - 2 * t / JOG_S) * 2)[:N]


def rings():
    """The flicks, and loose needles rattling in their slots, sound the shifting rings of the bed."""
    out, t, needle_db = np.zeros(N), np.arange(N) / SR, rub()[0]
    jog = jogs(needle_db)
    for width_hz, rows in RINGS:
        s, hz, db = np.transpose(rows)
        jolts = (rng.random(N) < RATTLE_PER_S / SR) * amp(RATTLE_SPREAD_DB * rng.standard_normal(N))
        shake = RATTLE_SHARE * unit(uniform_filter1d(jolts, size=80)) + RATTLE_SMOOTH + jog
        shake = shake * (rng.standard_normal(N) + 1j * rng.standard_normal(N))
        # resonate around 0 Hz, then shift up to the moving pitch
        keep = np.exp(-2 * np.pi * abs(width_hz) / SR)
        poles = [1, -2 * keep, keep ** 2]
        steady = np.std(shake.real) * np.linalg.norm(signal.lfilter([1], poles, t[:SR] == 0))
        pushed = signal.lfilter([1], poles, amp(needle_db + np.interp(t, s, db)) * shake)
        turns = np.cumsum(np.interp(t, s, hz)) / SR
        out += np.real(pushed * np.exp(2j * np.pi * turns)) / steady
    return out


def rings_at(s):
    """The bed's rings but the first at one moment, as (Hz, nominal width Hz, dB) modes."""
    now = lambda rows, column: np.interp(s, np.array(rows)[:, 0], np.array(rows)[:, column])
    return [(now(rows, column=1), width_hz, now(rows, column=2) + RING_IN_FLICK_DB)
            for width_hz, rows in RINGS[1:]]


def ping(hz, length):
    """A needle's own tone: it swells through the contact and dies, peak 1."""
    t = np.arange(3000) / SR
    waver = PING_WAVER * unit(uniform_filter1d(rng.standard_normal(len(t)), size=90))
    swell = 1 - np.exp(-(t / (1.8 * length)) ** 4)
    return peak(swell * np.exp(-t / PING_S) * np.sin(2 * np.pi * hz * t + waver), 0)


def flicks():
    """Every needle rings most near its own pitch, rebounds, snaps its latch and thuds the shell."""
    out, top = np.zeros(N + SR), np.array(NEEDLE)[:, 0] > FAMILIES_HZ[-2]
    still = np.array(NEEDLE)[~top]
    needle_db, shell_db, centre_hz = rub()
    for s, db, own_hz, top_db in FLICKS:
        at = round((s + .01) * SR)  # the rub is read just after the flick
        luck, weight, later, spring = rng.standard_normal(4)
        length = FLICK_S * np.exp(LONGER_PER_DB * (needle_db[at] + 51.0) + LENGTH_SPREAD * luck)

        stem = np.vstack([still, rings_at(s), (own_hz, OWN_WIDTH_HZ, OWN_DB)])
        near_db = 6 * np.exp(-(np.log(stem[:, 0] / own_hz) / 0.017) ** 2)
        chance_db = rng.normal(0, 2.5, len(stem))
        hit = snap(1.35 * length, 1.17 * length)
        rebound = snap(length, length + REBOUND_S * np.exp(0.28 * later))
        again = amp(REBOUND_DB + 1.6 * spring) * rebound
        ring = peak(filtered(hit + again, steep(stem, near_db + chance_db)), db - 4.5)
        ring += amp(db + PING_DB) * ping(own_hz, length)

        brief = 1.66 * length * np.exp(-SHARPER_PER_DB * np.clip(top_db + 10, 0, 9))
        latch = steep(LATCH, rng.normal(0, 4.2, len(LATCH)))
        click = peak(filtered(snap(brief, 0.002 + 0.96 * brief), latch), db + top_db + LATCH_CREST_DB)

        tilt_db = 1.5 * off_centre(np.array(SHELL)[:, 0], centre_hz[at])
        shell = modes(SHELL, tilt_db + rng.normal(0, 3.13, len(SHELL)))
        thud_db = shell_db[at] + THUD_DB + THUD_SPREAD_DB * weight
        thud = peak(filtered(burst(1.5 * length), shell), thud_db)
        out[round((s - .0035) * SR):][:len(ring)] += ring + click + thud
    return out[:N]


def scene():
    """The two microphone ports hear the near treble differently; the walls add a short tail."""
    near = creak() + knock() + wire() + slide() + rings() + flicks()
    lean = np.interp(np.arange(N) / SR, *np.transpose(LEAN)) / 2
    lead = 0.96 * lean * np.gradient(near)  # the nearer port hears it a little sooner
    close = (pair(near, scatter(near), NEAR_ALIKE) + [lead, -lead]) * amp([lean, -lean])
    both, left, right = tails(ROOM, count=3)
    delayed = np.pad(near, (300, 0))[None]  # the walls answer about 7 ms later
    walls = signal.fftconvolve(delayed, both + 0.054 * np.array([left, right]), axes=1)[:, :N]
    return air() + hum() + amp(-11.0) * walls + close


def record(dry):
    """The microphone keeps nothing above its band limit."""
    return filtered(dry, lambda hz: hz < TOP_HZ)


dry = scene()
out = record(dry)
int16_out(out)
```